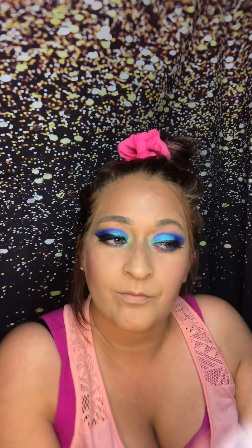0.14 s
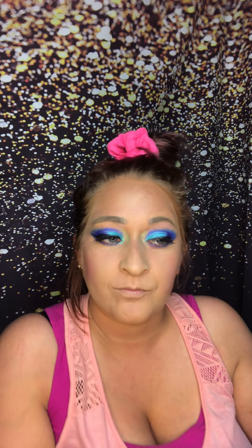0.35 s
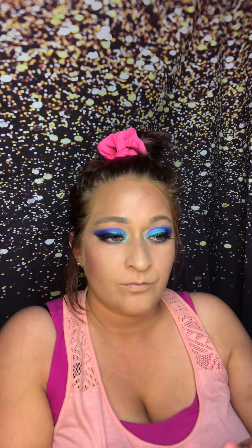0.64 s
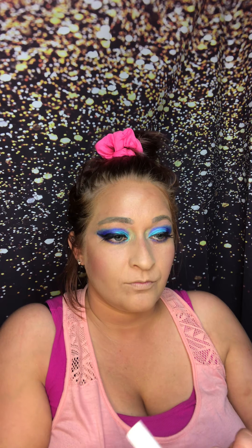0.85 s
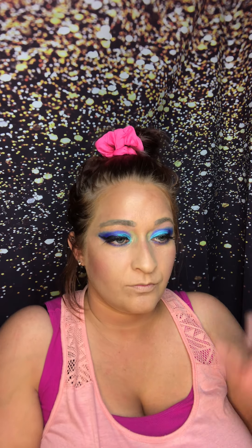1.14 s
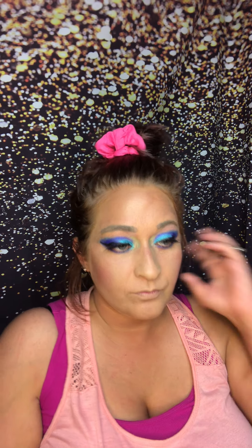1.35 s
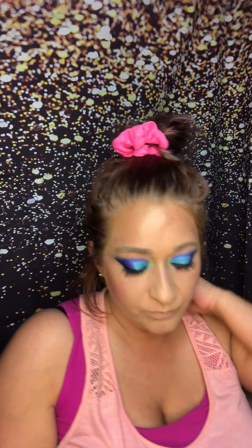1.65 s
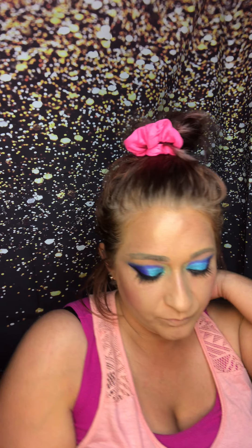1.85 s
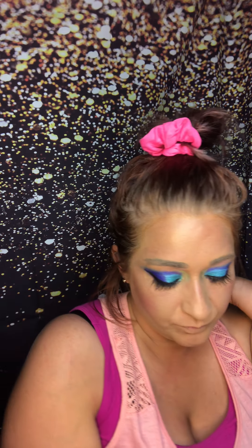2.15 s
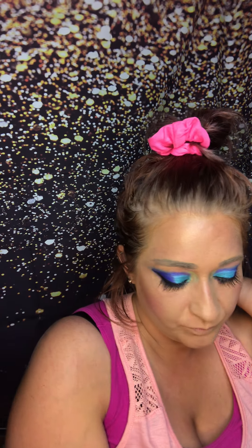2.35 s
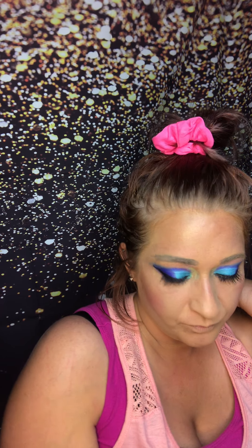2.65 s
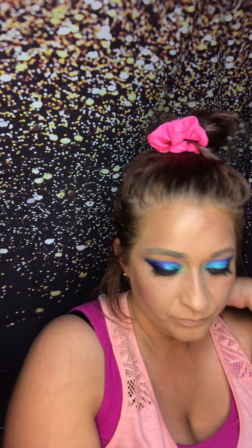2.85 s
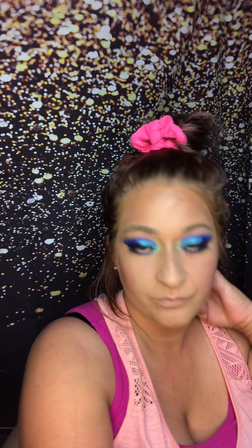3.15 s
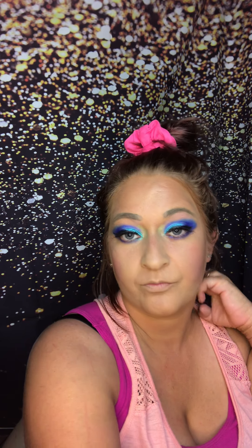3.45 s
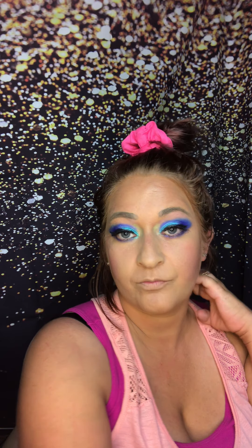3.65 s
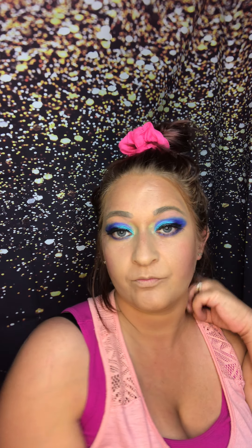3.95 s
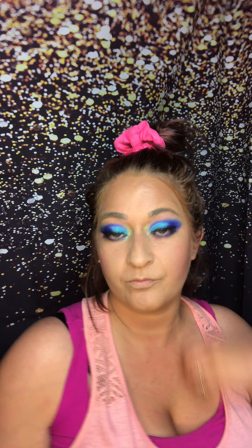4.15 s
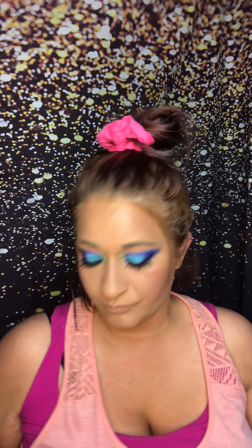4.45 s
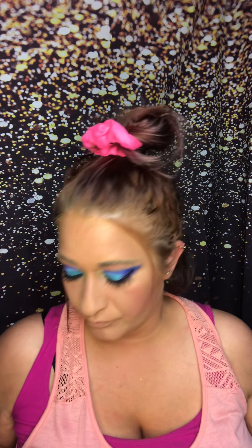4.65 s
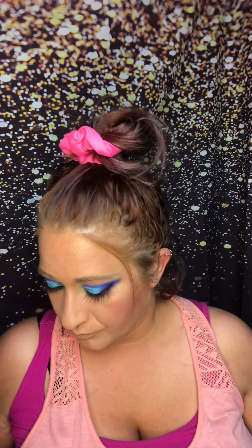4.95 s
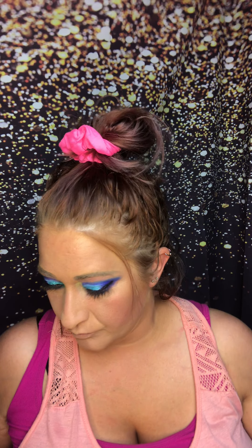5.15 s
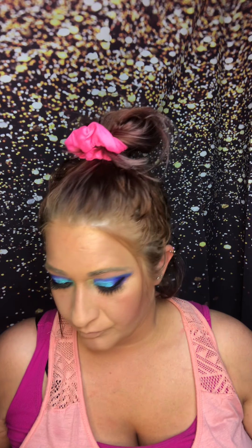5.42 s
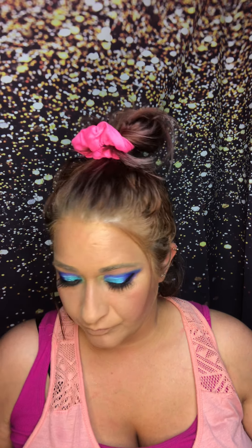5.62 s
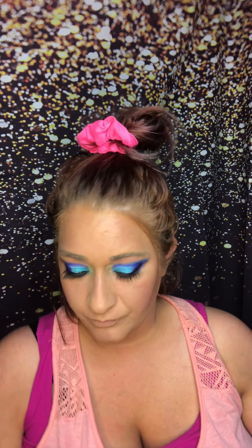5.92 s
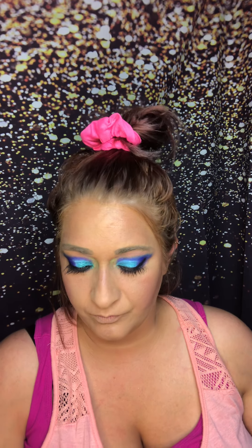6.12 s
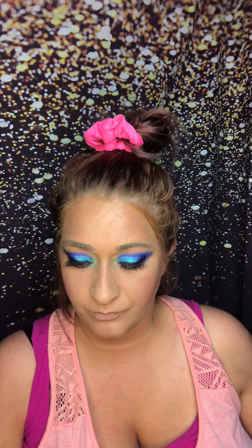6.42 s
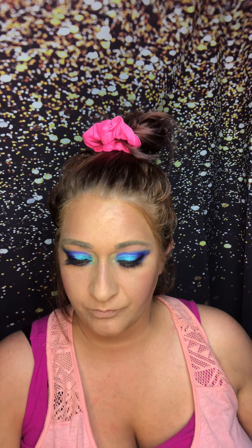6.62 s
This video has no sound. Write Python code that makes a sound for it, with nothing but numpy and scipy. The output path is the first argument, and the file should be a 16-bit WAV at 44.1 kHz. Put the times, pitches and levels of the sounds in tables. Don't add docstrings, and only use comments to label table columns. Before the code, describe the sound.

Close hard plastic clicks, a sharp snap, a bouncing and rattling compact, knocking jars and a brief tray clatter over faint room hiss.

```python
import sys
import numpy as np
from scipy import signal
from scipy.fft import rfft, irfft, next_fast_len
from scipy.io import wavfile
from scipy.ndimage import uniform_filter1d

SR = 44100
rng = np.random.default_rng(int(sys.argv[2]) if len(sys.argv) > 2 else 0)


def gain_from_db(level_db):
    decades = np.asarray(level_db, float) / 20
    return 10 ** decades


def inscribe(sig):
    pcm = np.round(np.clip(np.atleast_2d(sig).T, -1, 1) * 32767)
    wavfile.write(sys.argv[1], SR, pcm.astype(np.int16))


N = 298913
LEAD = 200


def evened(x):
    return x / np.sqrt(np.mean(x ** 2) + 1e-20)


def peaked(x):
    return x / (abs(x).max() + 1e-12)


def levelled(x, size):
    z = rfft(x, next_fast_len(len(x) + 4 * LEAD))
    z = z / np.sqrt(uniform_filter1d(abs(z) ** 2, size=size) + 1e-20)
    return np.roll(irfft(z), LEAD)


def read(points, hz):
    f, value = np.transpose(points)
    return np.interp(np.log(hz + 1), np.log(f + 1), value)


def add(mix, s, sound):
    part = mix[round(s * SR):][:len(sound)]
    part += sound[:len(part)]


def noise(spectrum, patchy_db):
    frames, hz = N // 256 + 5, np.fft.rfftfreq(1024, 1 / SR)
    a, b, patches = rng.standard_normal((frames, 513, 3)).T
    patches = uniform_filter1d(patches, 10, axis=0)
    patches = evened(uniform_filter1d(patches, 12, axis=1))
    z = (a + 1j * b) * gain_from_db(read(spectrum, hz)[:, None] + patchy_db * patches)
    return evened(signal.istft(z, nperseg=1024, noverlap=768)[1][:N])


# frequency in Hz, density in dB per Hz.
AIR_SPECTRUM = [(18, -36), (34, -4), (110, -6.5), (200, -9), (512, -15.5), (2610, -28.5), (6000, -33),
                (16000, -45.5)]
AIR_DB = -64
HUM_HZ, HUM_WIDTH_HZ, HUM_DB = 122.6, 3.8, -74


def air():
    pole = np.exp(-np.pi * HUM_WIDTH_HZ / SR)
    slow = signal.lfilter([1], [1, -pole], rng.standard_normal((2, N)))
    hum = ((slow[0] + 1j * slow[1]) * np.exp(2j * np.pi * HUM_HZ * np.arange(N) / SR)).real
    return gain_from_db(AIR_DB - 1.5) * noise(AIR_SPECTRUM, patchy_db=2.0) + gain_from_db(HUM_DB) * evened(hum)


# time in seconds, level in dB.
SLEEVE_LEVEL = [
    (3.85, -91),
    (3.981, -77),
    (4.33, -75),
    (4.38, -71.5),
    (4.59, -73.5),
    (4.65, -79.5),
    (6.55, -86),
    (6.62, -100),
]
# frequency in Hz, density in dB per Hz.
CLOTH_SPECTRUM = [(300, -21), (1000, 5), (3000, -1.5), (6500, -4.5), (10500, -9.5), (13500, -4),
                  (16000, -6.5)]


def sleeve():
    s, db = np.transpose(SLEEVE_LEVEL)
    level_db = np.interp(np.arange(N) / SR, s, db, -130, -130)
    return gain_from_db(level_db + 3) * noise(CLOTH_SPECTRUM, patchy_db=.8)


# frequency in Hz, t60 in seconds.
ROOM_T60 = [(150, 0.24), (500, 0.61), (1000, 0.4), (2500, 0.25), (6000, 0.23), (12000, 0.17), (16000, 0.18)]
ROOM_DB = -6
LATE_DB, EARLY_T60_S = 11.5, 0.094
SCATTER_HZ, SCATTER_FROM_HZ = 140, 800


def echo_tail():
    taps = np.zeros(SR // 2)
    slots = np.arange(70, len(taps) - 16, 16)
    taps[slots + rng.integers(0, 16, len(slots))] = rng.choice([-1., 1.], len(slots))
    fading = taps * gain_from_db(-60 * np.arange(len(taps)) / SR / EARLY_T60_S)
    early = levelled(fading, size=90)[LEAD:][:len(taps)] * 3.0
    taps = early + taps / np.linalg.norm(taps) * gain_from_db(LATE_DB)
    hz, lag_s, z = signal.stft(taps, SR, nperseg=256)
    tail = signal.istft(z * gain_from_db(-60 * lag_s / read(ROOM_T60, hz)[:, None]), SR, nperseg=256)[1]
    tail[:70] = 0
    return tail / np.linalg.norm(tail)


def room(x):
    out, t = np.zeros(N), np.arange(N) / SR
    low = signal.sosfiltfilt(signal.butter(2, SCATTER_FROM_HZ, fs=SR, output="sos"), x)
    high = signal.hilbert(x - low, next_fast_len(N))[:N]
    for k in range(3):
        share = np.sqrt(2 / 3) * np.cos(2 * np.pi * (7 * t + k / 3))
        face = (high * np.exp(2j * np.pi * SCATTER_HZ * (k - 1.5) * t)).real / np.sqrt(3)
        out += signal.oaconvolve(low * share + face, echo_tail())[:N]
    return out


# start in seconds, peak in dB, pitch in Hz.
THUDS_AT = [
    (5.456, -36.5, 175),
    (5.536, -43.5, 141),
    (5.576, -49, 141),
    (5.705, -42.5, 182),
    (5.754, -51.5, 131.2),
    (5.959, -53, 130.3),
    (6.281, -48.5, 142),
]
THUD_T60_S = 0.11


def thuds():
    out, t = np.zeros(N), np.arange(8000) / SR
    for s, db, hz in THUDS_AT:
        pair = np.sin(2 * np.pi * hz * t) + 0.67 * np.sin(2 * np.pi * 1.27 * hz * t)
        swell = 1 - np.exp(-t / 0.0013)
        add(out, s, gain_from_db(db - 3.5) * peaked(pair * swell * gain_from_db(-60 * t / THUD_T60_S)))
    return out


EDGE_OCTAVES = .15


def ring(modes, stray, band_hz, tilt_db=0, edge_hz=1, edge_db=0):
    f = abs(np.fft.fftfreq(4096, 1 / SR)) + 1
    hz, width, db = np.transpose(modes)[:, :, None]
    bend, weight = stray[:, :len(modes), None]
    hz = hz * (1 + .012 * bend)
    power = (gain_from_db(2 * db + 2.8 * weight) / (width ** 2 + (2 * (f - hz)) ** 2)).sum(0)
    power *= gain_from_db(2 * tilt_db * np.log2(f / band_hz[0]))
    power *= gain_from_db(2 * edge_db * np.exp(-(np.log2(f / edge_hz) / EDGE_OCTAVES) ** 2))
    power /= (1 + (band_hz[0] / f) ** 8) * (1 + (f / band_hz[1]) ** 6)
    log_gain = .5 * np.log(power + 1e-9 * power.max())
    minimum_phase = np.exp(np.conj(signal.hilbert(log_gain)))
    return np.fft.ifft(minimum_phase).real[:3800] * np.hanning(7600)[3800:] ** .5


CONTACTS_PER_S = 13000


def contact_forces(rise_s, chatter_s, loose, sharp):
    t = np.arange(2500) / SR
    after_s = np.maximum(t - rise_s, 0)
    lands = rng.random(len(t)) < CONTACTS_PER_S / SR
    force = loose * lands * rng.standard_normal(len(t))
    force *= np.minimum(t / rise_s, 1) ** 1.9 * gain_from_db(-60 * after_s / chatter_s)
    force[round(.6 * rise_s * SR)] = 1
    quick = force * gain_from_db(-60 * after_s / chatter_s * (1 / np.clip(sharp, .1, 1) - 1))
    return [levelled(push, size=30) for push in (force, quick, force)]


# frequency in Hz, width in Hz, level in dB.
TABLE_MODES = [(134, 120, -7), (188, 190, -3), (218.37, 37, -4.5), (292, 36, -2.5), (374.4, 98, -4.5)]
# low, high edge in Hz.
PASS_BANDS = [(505, 3100), (2240, 22000), (106, 690)]
EDGE_BODY_DB, EDGE_CRACK_DB = 7.5, 6
DULL, WEAK, HARD_DB = 0.058, 0.14, -27
SLOW_RISE = .5
LINGER, FIRM_DB = 0.036, -26


def knocks(rows, body, crack, touch, base=TABLE_MODES, dull=DULL, edges=None, sharp=1):
    out = np.zeros(N)
    touch_rise_s, touch_chatter_s, loose = touch
    edges = edges or [(1, 1, 0.0046)] * len(rows)
    for row, (body_hz, crack_hz, longer_db) in zip(rows, edges):
        s, body_db, crack_db, base_db, *lean_db = row
        rise_s = np.clip(touch_rise_s * gain_from_db(SLOW_RISE * (body_db - crack_db)), 1 / SR, .01)
        chatter_s = max(touch_chatter_s * gain_from_db(LINGER * (FIRM_DB - body_db) + longer_db), .001)
        forces = contact_forces(rise_s, chatter_s, loose, sharp)
        stray = rng.standard_normal((3, 2, 9))
        soft_db = -dull * max(body_db - crack_db + 7.0, 0) - WEAK * max(HARD_DB - crack_db, 0)
        responses = (ring(body, stray[0], PASS_BANDS[0], sum(lean_db), body_hz, EDGE_BODY_DB),
                     ring(crack, stray[1], PASS_BANDS[1], soft_db, crack_hz, EDGE_CRACK_DB),
                     ring(base, stray[2], PASS_BANDS[2]))
        start_s = s - .6 * rise_s - LEAD / SR
        for db, push, response in zip((body_db, crack_db, base_db), forces, responses):
            add(out, start_s, gain_from_db(db) * peaked(signal.fftconvolve(push, response)))
    return out


# start in seconds, body, crack, table peaks in dB, body lean in dB per octave.
TICKS_AT = [
    (3.978, -58, -56, -56.5, -6.5),
    (4.257, -52.5, -48.5, -58.5, 10),
    (4.669, -37.5, -37.5, -66, 5.5),
    (5.1145, -49.5, -51, -63, -8.5),
    (5.550, -57.5, -55, -55, 10),
    (6.093, -63, -56.5, -61, 10.5),
    (6.116, -46.5, -40, -63.5, -10.5),
    (6.771, -55.5, -63, -47.5, -2),
]
# frequency in Hz, width in Hz, level in dB.
TICK_WALLS = [(980, 127.5, 5.7), (1426, 260, 12.7), (2000, 190, 3.9)]
# frequency in Hz, width in Hz, level in dB.
TICK_CONTACT = [(3000, 500, 22.5), (4120, 590, 28), (6200, 2300, 24), (8800, 4300, 28), (14210, 3000, -18)]


def ticks():
    return knocks(TICKS_AT, TICK_WALLS, TICK_CONTACT, (0.0026, 0.013, 0.788))


# start in seconds, body, crack, base peaks in dB.
TRAY_AT = [(4.9828, -35, -48.5, -49), (4.9893, -31.5, -43, -44), (4.9928, -31.5, -46, -38),
           (4.9993, -33, -37.5, -37), (5.0052, -27.5, -38.5, -50), (5.0093, -29.5, -41, -41),
           (5.021, -38, -53.5, -39), (5.2075, -31, -36, -48), (5.219, -41, -51, -54),
           (5.2435, -30.5, -36.5, -44), (5.256, -40, -49, -47), (5.262, -29, -26, -38),
           (5.2747, -31, -34, -41), (5.2872, -23.5, -43, -33.5), (5.2925, -27.5, -36, -52),
           (5.306, -38, -50.5, -38), (5.3195, -30.5, -29, -49), (5.333, -35, -47.5, -46),
           (5.343, -38, -54, -46), (5.3725, -36, -48, -60), (5.393, -43, -53, -55),
           (5.461, -54.5, -65.5, -46.5)]
# body pitch in Hz, crack pitch in Hz, longer chatter in dB.
TRAY_EDGES = [(1090, 3400, 6), (1930, 3600, 4), (800, 4200, -4), (1080, 3800, -6), (1270, 3300, -17),
              (1210, 3500, -7), (1200, 3000, -3), (1234.4, 4724, -2), (1500, 3000, 2), (1050, 4400, -1.5),
              (1320, 4300, 5), (1370, 3900, 4), (1340, 4100, 2.5), (707, 3930, -6.5), (1260, 4413, 6.5),
              (590, 3000, -8.5), (1120, 4660, -7), (1250, 3300, 1), (1120, 3000, -6), (1710, 2600, 1),
              (1000, 3200, 9), (1240, 4260, -1)]
# frequency in Hz, width in Hz, level in dB.
TRAY_WALLS = [(385, 16, -6.5), (590, 280, -13), (638, 154, 4), (969, 99, -0.5), (1303, 200, 4.5),
              (1600, 280, -28), (1950, 490, 5.5)]
# frequency in Hz, width in Hz, level in dB.
TRAY_CONTACT = [(2913, 1800, -14), (3900, 600, 6), (5026, 4300, 16), (5700, 1300, -17), (6000, 530, 3.5),
                (8400, 3700, 10), (11800, 1100, -8), (14510, 2900, -16)]
# frequency in Hz, width in Hz, level in dB.
DRAWER_MODES = [(142, 140, 10), (217, 22, -0.5), (310, 61, 3), (400, 130, -21)]


def tray():
    return knocks(TRAY_AT, TRAY_WALLS, TRAY_CONTACT, (.003, 0.034, 0.35), DRAWER_MODES,
                  dull=0.36, edges=TRAY_EDGES, sharp=0.74)


# start in seconds, body, crack, base peaks in dB.
JARS_AT = [(3.2887, -23.5, -15, -46.5), (3.299, -29.5, -25, -33), (3.312, -28.5, -33, -60),
           (3.353, -36, -41, -43.5), (3.3832, -54.5, -53.5, -44.5), (3.4312, -47, -54.5, -47),
           (3.5367, -29.5, -28, -39), (3.5449, -22, -23.5, -57), (3.556, -32, -38, -33),
           (3.588, -28, -31, -39.5), (3.629, -33, -27, -40), (3.649, -33.5, -39, -42.5),
           (3.666, -42, -42.5, -61), (3.681, -43.5, -46, -47.5), (3.709, -42, -48.5, -48),
           (3.748, -68, -53, -49), (3.764, -53, -60, -76)]
# body pitch in Hz, crack pitch in Hz, longer chatter in dB.
JAR_EDGES = [(2060, 3600, 1), (1480, 2200, -2.5), (720, 3300, 4), (1740, 8800, 0), (480, 4600, 6),
             (590, 2426.4, 3.5), (1470, 4200, 4.5), (1400, 8050, 0.5), (1769, 5700, -0.5),
             (2080, 5100, 3.5), (1950, 4400, 0), (656, 4300, 0.5), (1414.1, 2300, 0.5), (690, 5035, 6),
             (675, 2300, -1), (480, 6700, 2.5), (735, 2400, 2)]
# frequency in Hz, width in Hz, level in dB.
JAR_WALLS = [(443, 240, -3), (531, 150, -11), (666, 65, 9), (929, 120, 9.5), (1280, 140, 11.5),
             (1450, 320, 13), (1800, 310, 13.5), (2375, 130, -29)]
# frequency in Hz, width in Hz, level in dB.
JAR_CONTACT = [(2826, 1600, 3.5), (3595.3, 790, -0.5), (4135.2, 230, -9), (5600, 2000, -1.5),
               (6400, 640, -12), (7460, 420, -6.5), (9600, 3200, 0), (13000, 2200, -11.5)]
# frequency in Hz, width in Hz, level in dB.
SHELF_MODES = [(223, 90, -8.5), (296, 90, -0.5), (366, 150, -2), (431, 80, 2.5)]
JAR_TOUCH, SCRAPE_TOUCH = (0.0041, 0.042, 1.2), (0.0052, 0.051, 0.28)
SCRAPE_FROM_S = 3.5


def jars():
    early = sum(row[0] < SCRAPE_FROM_S for row in JARS_AT)
    loose = knocks(JARS_AT[:early], JAR_WALLS, JAR_CONTACT, JAR_TOUCH, SHELF_MODES,
                   edges=JAR_EDGES[:early])
    dragged = knocks(JARS_AT[early:], JAR_WALLS, JAR_CONTACT, SCRAPE_TOUCH, SHELF_MODES,
                     edges=JAR_EDGES[early:])
    return loose + dragged


# start in seconds, body, crack peaks in dB, lean in dB per octave.
ROCK_AT = [(2.690, -38, -56, 3), (2.6955, -27.5, -32.5, -2), (2.7517, -38, -47.5, 0),
           (2.77, -26.5, -32.5, -3), (2.8270, -40, -56, -5.5), (2.833, -30, -41, -2.5),
           (2.8865, -38, -53.5, -1.5), (2.892, -34.5, -52, 4), (2.937, -32.5, -55, -0.5),
           (2.9451, -37.5, -55, 4), (2.966, -44, -56.5, 3), (2.9794, -21.5, -25, 1),
           (3.0352, -34.5, -53, 2.5), (3.078, -32, -48, -3.5), (3.087, -41, -55.5, -6),
           (3.119, -35.5, -47.5, -2.5), (3.156, -30, -47.5, -7), (3.186, -34, -45.5, -2),
           (3.203, -36.5, -52.5, 4), (3.215, -35, -47, -2.5), (3.229, -36.5, -51, -5.5),
           (3.237, -36.5, -53, 0), (3.2501, -37, -54, -4)]
# body pitch in Hz, crack pitch in Hz, longer chatter in dB.
ROCK_EDGES = [(1080, 2600, 3), (1540, 3400, 1), (1116, 4300, 0), (1970, 3540, -3), (980, 2900, 0),
              (643, 3900, -1.5), (1110, 2600, 0), (1227, 3000, 2), (1256, 4630, 1), (1170, 3700, 0),
              (2290, 2500, 2), (1300, 2400, -7.5), (1253.9, 2500, 1), (649.74, 3000, 1), (1216, 2610, 0),
              (1003.3, 3050, 1), (1144, 3700, -0.36), (1297.8, 2400, -1), (1106, 4500, 0), (670, 2100, -1),
              (1153, 3300, 0), (690, 3400, 0), (1130, 3590, 0)]
# frequency in Hz, width in Hz, level in dB.
ROCK_WALLS = [(510, 70, -7), (576, 13, -1), (670, 25.8, 0), (800, 67, -0.5), (967, 44, 5), (1153, 34, -0.5),
              (1350, 130, 8.5), (1607.6, 1800, -16.5), (2056, 370, 11)]
# frequency in Hz, width in Hz, level in dB.
ROCK_CONTACT = [(2600, 2000, 9.5), (3400, 1500, 8), (4070, 1200, 14), (6640, 1100, 7.5), (7820, 3300, -5.5),
                (11000, 5400, -25), (14630, 600, -24)]
ROCK_THUMP_DB = -18


def compact_rocks():
    tips = [(s, body_db, crack_db, body_db + ROCK_THUMP_DB, lean_db)
            for s, body_db, crack_db, lean_db in ROCK_AT]
    return knocks(tips, ROCK_WALLS, ROCK_CONTACT, (0.0033, 0.019, 0.54),
                  dull=0.34, edges=ROCK_EDGES, sharp=.45)


# start in seconds, body, crack, table peaks in dB, lean in dB per octave.
DROP_AT = [(2.400, -39, -55.5, -46.5, 0.5), (2.4440, -21.5, -36, -41, 0),
           (2.4545, -32.5, -53.5, -42.5, -3.5), (2.468, -35.5, -62, -46, -6),
           (2.4815, -28, -45, -43.5, 1.5), (2.4886, -12.5, -17.5, -29.5, 3.5), (2.4931, -15.5, -23, -33, 0),
           (2.5173, -19.5, -30.5, -29, 4.5), (2.522, -16, -22, -37.5, 2.5), (2.5432, -21, -35, -38, -0.5),
           (2.5467, -6, -16.5, -32, 1.5), (2.574, -30, -42.5, -44, -1), (2.5972, -18.5, -28, -40.5, -4),
           (2.6038, -22.5, -36.5, -65, -1), (2.6125, -25.5, -44.5, -49, -1)]
# body pitch in Hz, crack pitch in Hz, longer chatter in dB.
DROP_EDGES = [(656.6, 5000, 1.5), (1378, 4800, -4), (620, 3000, -0.5), (550, 3800, 0.5), (696, 2800, 0.5),
              (1759, 3600, -0.5), (760, 3800, -2), (1290, 3430, -3.5), (1400, 2200, 0), (580, 3000, -0.5),
              (1110, 4200, -5.5), (614.2, 3000, -1), (1380, 4300, -3), (1290, 2800, -3.5), (615, 2800, -13)]
# frequency in Hz, width in Hz, level in dB.
COMPACT_WALLS = [(495, 43, -12), (600, 34, -12.5), (625, 100, 2), (736, 170, -3.5), (931.6, 14, -10.5),
                 (1100, 250, 5), (1365, 66, -2.5), (1630, 330, -1), (2050, 160, -4.5)]
# frequency in Hz, width in Hz, level in dB.
COMPACT_CONTACT = [(2790, 3100, 12.5), (3153, 1500, -2.5), (4100, 700, 12.5), (4500, 566, -6.5),
                   (6400, 2280, 12.5), (6880, 1400, -5.5), (9020, 18000, -6), (14000, 3000, -20)]


def compact_drops():
    return knocks(DROP_AT, COMPACT_WALLS, COMPACT_CONTACT, (.0014, 0.02, 0.41), edges=DROP_EDGES, sharp=.7)


# start in seconds, body, crack, table peaks in dB.
LIP_AT = [
    (.9011, -44.5, -51.5, -77.5),
    (1.1809, -62, -61, -70.5),
]
# frequency in Hz, width in Hz, level in dB.
LIP_WALLS = [(2320, 300, -4.5), (1306, 500, -14)]
# frequency in Hz, width in Hz, level in dB.
LIP_CONTACT = [(3661, 460, -5.5), (6200, 600, 0.5), (7000, 5000, 2), (9360, 2000, -8.5)]


def cap_on_lip():
    return knocks(LIP_AT, LIP_WALLS, LIP_CONTACT, (0.00081, .015, .9))


# start in seconds, body, crack, table peaks in dB.
CAP_AT = [
    (1.0242, -25, -26, -72.5),
]
# frequency in Hz, width in Hz, level in dB.
CAP_WALLS = [(1020, 240, -15), (1410, 86, -11), (1720, 70, -7), (1790, 50, 4), (1900, 70, -4.5)]
# frequency in Hz, width in Hz, level in dB.
CAP_CONTACT = [(2820, 400, -2), (3070, 400, -6.5), (5250, 279.3, -1), (5650, 350, 6.5), (7230, 360, 3.5),
               (8800, 7000, -4), (11800, 920, -4), (13640, 1100, 0)]


def cap_click():
    return knocks(CAP_AT, CAP_WALLS, CAP_CONTACT, (0.00055, 0.0018, 0.22))


CAP_RING_HZ, CAP_RING_DB, CAP_RING_T60_S = 1830, -54, .25


def cap_ring():
    out, t = np.zeros(N), np.arange(SR // 3) / SR
    pair = np.sin(2 * np.pi * CAP_RING_HZ * t) + 0.43 * np.sin(2 * np.pi * 1.1 * CAP_RING_HZ * t)
    add(out, CAP_AT[0][0], gain_from_db(CAP_RING_DB - 60 * t / CAP_RING_T60_S) * pair)
    return out


# start in seconds, body, crack, table peaks in dB.
SNAP_AT = [
    (1.2038, -11, -7, -68.5),
]
# frequency in Hz, width in Hz, level in dB.
SNAP_WALLS = [(560, 300, -10.5), (830, 100, -4), (1004, 110, 0), (1190, 130, 0), (1280, 130, -3.5),
              (1520, 270, -6.5), (1993, 170, -1.5), (2269, 130, -3), (2453.3, 140, -7.5)]
# frequency in Hz, width in Hz, level in dB.
SNAP_CONTACT = [(3220, 770, -2), (4130, 640, -4), (4800, 700, -5), (5600, 950, 2.5), (6500, 690, 2.5),
                (8500, 8900, 12), (11700, 1200, -6.5), (14000, 2200, -0.5)]


def cap_snap():
    return knocks(SNAP_AT, SNAP_WALLS, SNAP_CONTACT, (.0007, 0.0073, 0.65))


SWELL_HZ, SWELL_DB, SWELL_S = (1100, 2410), (-24.5, -36.5), .0035


def snap_swell():
    out, t = np.zeros(N), np.arange(-900, 60) / SR
    walls = sum(gain_from_db(db) * np.sin(2 * np.pi * hz * t) for hz, db in zip(SWELL_HZ, SWELL_DB))
    add(out, SNAP_AT[0][0] + t[0], walls * np.exp(np.minimum(t, -8 * t) / SWELL_S))
    return out


CAP_WET, SNAP_WET = .45, 0.88


def scene():
    cap = cap_on_lip() + cap_click()
    snap = cap_snap()
    table = thuds() + ticks() + tray() + jars() + compact_rocks() + compact_drops()
    near = table + cap + cap_ring() + snap + snap_swell()
    to_room = near - (1 - CAP_WET) * cap - (1 - SNAP_WET) * snap
    return (near + gain_from_db(ROOM_DB) * room(to_room) + air() + sleeve())[None]


def top_cut(x):
    return signal.sosfilt(signal.butter(12, 16640, fs=SR, output="sos"), x)


MIC_HZ = (38, 16150)
SMEAR_DB, SMEAR_S, SMEAR_HZ = -25, .018, (600, 8500)


def record(dry):
    low_cut = signal.sosfilt(signal.butter(3, MIC_HZ[0], "highpass", fs=SR, output="sos"), dry)
    heard = signal.oaconvolve(low_cut, signal.firwin(255, MIC_HZ[1], fs=SR)[None], "same")
    grain = rng.standard_normal(1200)
    lead = grain * np.clip(1 - np.arange(len(grain)) / SR / SMEAR_S, 0, 1)
    lead /= np.linalg.norm(lead)
    middle = signal.sosfiltfilt(signal.butter(4, SMEAR_HZ, "bandpass", fs=SR, output="sos"), heard)
    ahead = signal.oaconvolve(middle[:, ::-1], lead[None])[:, :N][:, ::-1]
    return top_cut(heard + gain_from_db(SMEAR_DB) * ahead)


dry = scene()
out = record(dry)
inscribe(out)
```